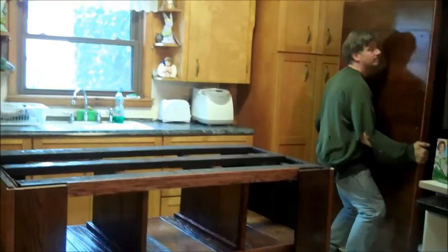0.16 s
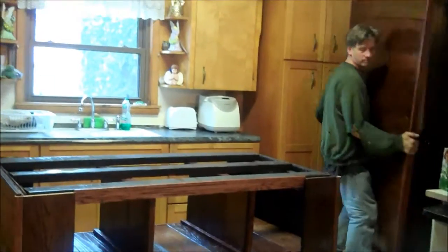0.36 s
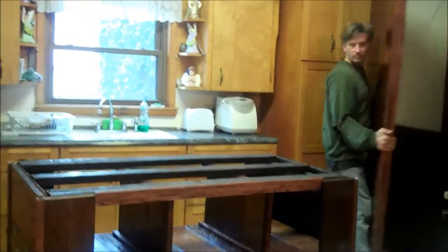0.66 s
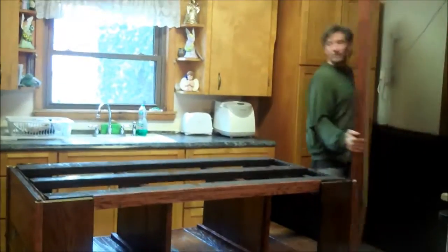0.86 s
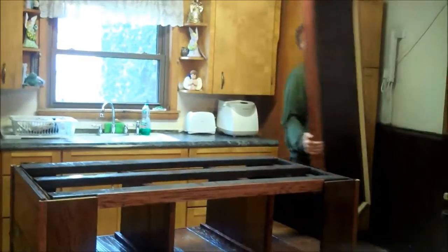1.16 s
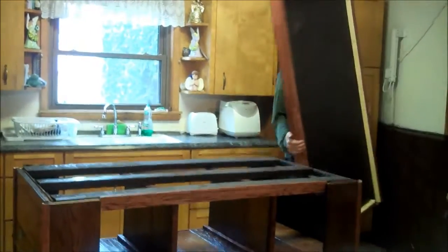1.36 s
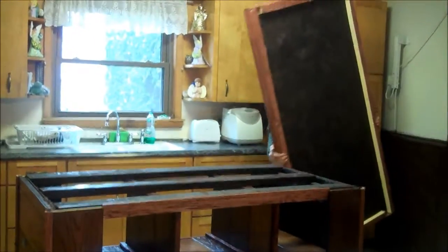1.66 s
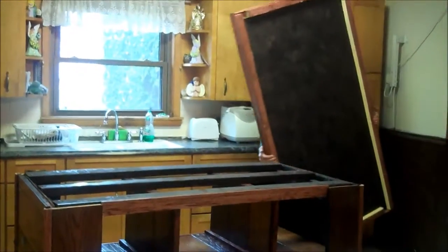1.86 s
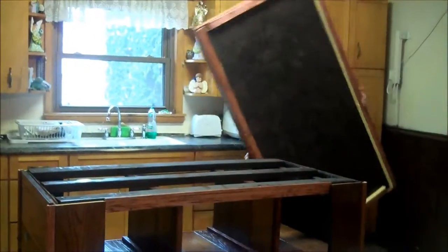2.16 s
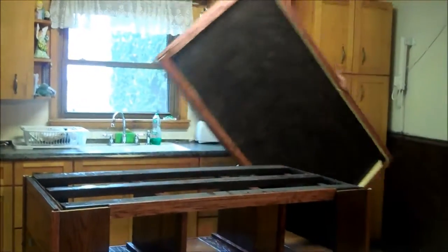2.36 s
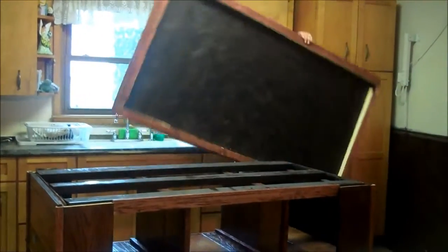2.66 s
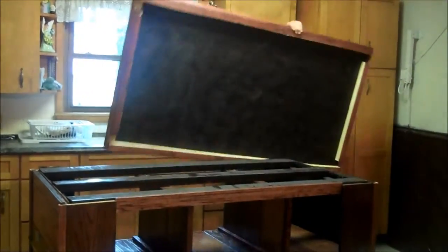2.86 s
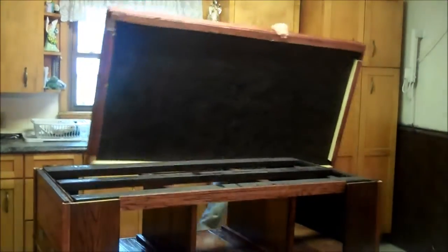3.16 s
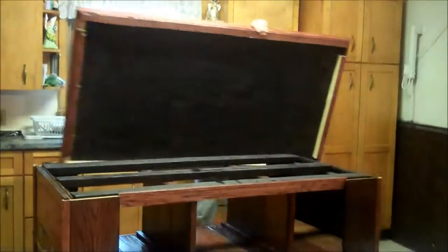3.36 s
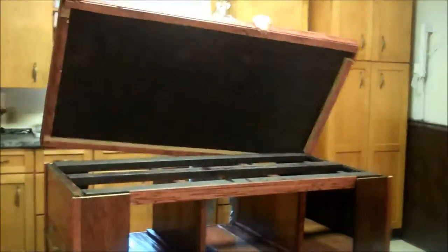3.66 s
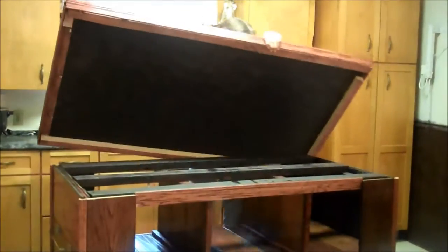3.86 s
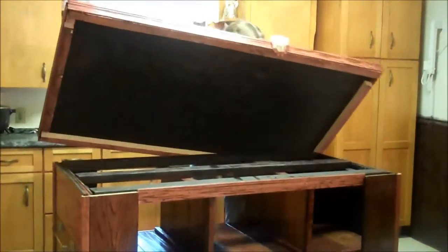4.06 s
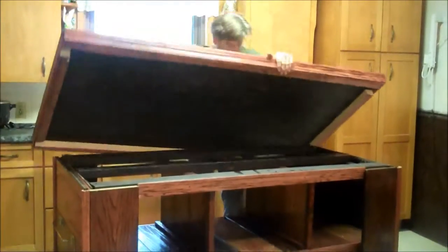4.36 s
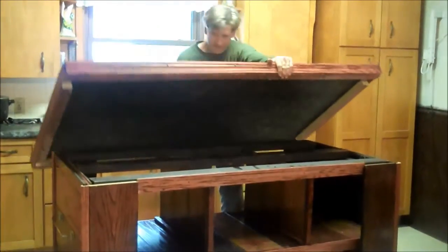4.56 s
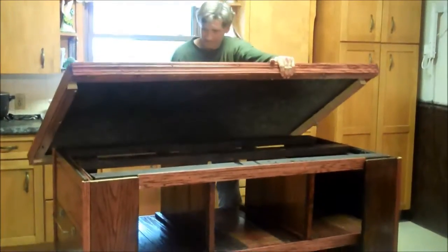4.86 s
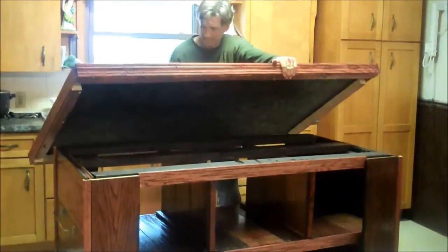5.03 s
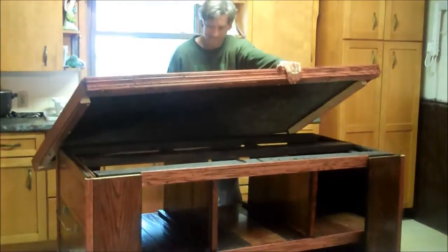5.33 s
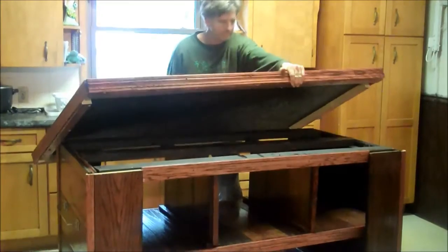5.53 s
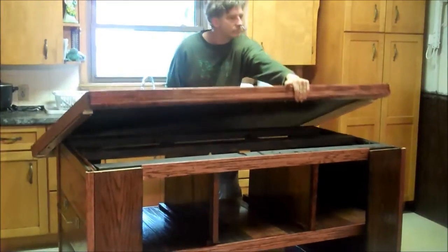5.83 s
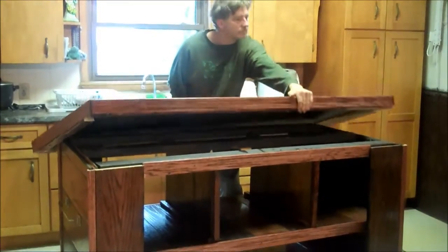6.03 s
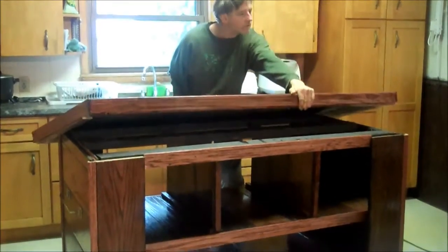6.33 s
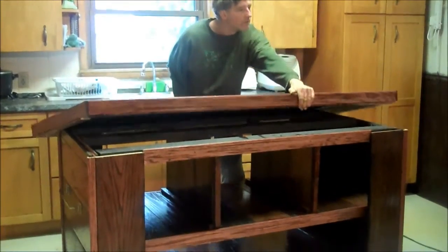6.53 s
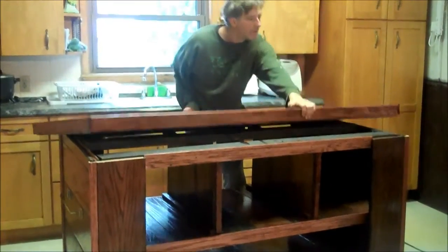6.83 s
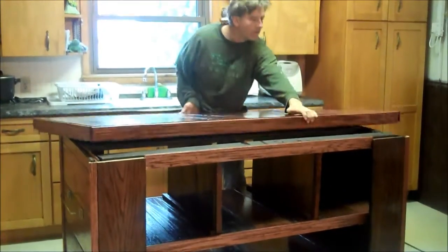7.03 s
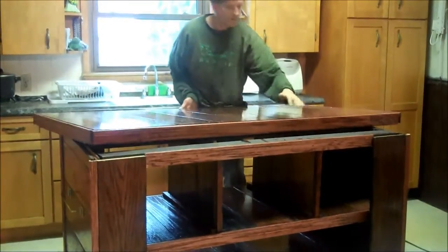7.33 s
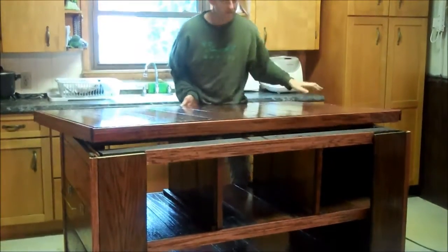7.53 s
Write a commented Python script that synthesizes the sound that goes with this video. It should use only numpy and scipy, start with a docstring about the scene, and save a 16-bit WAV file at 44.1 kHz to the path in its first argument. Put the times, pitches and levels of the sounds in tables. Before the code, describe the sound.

A heavy wooden top squeaks, cracks loudly onto its base and thuds into place, amid faint rustling in a kitchen.

```python
"""Clothes rustle and wood rubs and ticks over a faint hum: a man carries a heavy tabletop across a kitchen.
Soft blows bend the board into dull thuds. As he tips it onto its wooden base, the edge sticks and slips
in a squeak, then slams home with a loud crack that sets board and frame ringing. It drops into its seat
with a hollow clack and settles with more thuds. The hard room rings; the microphone ports add a hissy peak.
"""
import sys
import numpy as np
from scipy import signal
from scipy.fft import rfft, irfft
from scipy.io import wavfile
from scipy.ndimage import uniform_filter1d

SR = 44100
rng = np.random.default_rng(int(sys.argv[2]) if len(sys.argv) > 2 else 0)


def master_out(mix):
    """Clip the mix to full scale and print it as 16-bit PCM to the path in sys.argv[1]."""
    frames = np.transpose(np.atleast_2d(mix))
    ceiling = np.clip(frames, -1, 1)
    pcm = np.round(ceiling * 32767).astype(np.int16)
    wavfile.write(sys.argv[1], SR, pcm)


N = 339349

# Levels are set ahead of each layer's trim, the room and the microphone.
ROOM_DECAY = [(60, 0.54), (250, 0.84), (900, 0.37), (1600, 0.49), (3500, 0.4), (8000, 0.4), (14000, 0.3)]  # the kitchen's tail: frequency_hz, t60_s
STEREO_LIKENESS = [(60, 0.97), (300, 0.91), (630, 0.97), (1370, 0.58), (3000, 0.19), (6500, -0.4),
                   (14000, -0.021)]  # how alike left and right are in diffuse sound: frequency_hz, correlation
PORT_EQ = [(60, -7.5, -3.5), (930, 3.5, 6.5), (1245, -1, 1.5), (2320, 3.5, 0.94), (4570, 5, 4),
           (6420, 8.5, 3.5), (7770, 15, 8), (9570, 8.5, 9.5), (14400, 12.5, 10.5)]  # response of the two microphone ports: frequency_hz, left_db, right_db
AIR_EQ = [(20, -7), (45, -1), (90, -9), (130, 0.5), (190, -5.5), (280, 0.5), (400, -3), (850, -8),
          (1500, -7.5), (3500, -13), (7000, -15), (9500, -17.5), (11000, -25.5), (14000, -30)]  # room tone: frequency_hz, gain_db
MOTOR_HUM = [(59.2, -61.5), (296.1, -70), (1297, -70)]  # tones of a mains-driven motor: pitch_hz, level_db
HISS_BANDS = [(7820, 640, -79), (11830, 180, -83.5)]  # two faint, narrow bands of high hiss: centre_hz, width_hz, level_db

# each move of the body drags cloth and board together: peak_s, swell_s, fade_s, cloth_db, rub_db
STROKES = [(0.27, 0.073, 0.067, -48.5, -50), (0.355, 0.016, 0.087, -50, -55),
           (0.56, 0.025, 0.092, -47.5, -54.5), (0.68, 0.056, 0.077, -65, -50),
           (0.94, 0.028, 0.026, -51, -52.5), (1.10, 0.061, 0.095, -47, -52.5),
           (1.27, 0.053, 0.022, -51.5, -55), (1.75, 0.09, 0.032, -52, -53.5), (2.12, 0.017, .015, -50, -56),
           (2.24, .01, 0.26, -53.5, -59), (2.40, 0.08, 0.087, -53, -48), (2.48, 0.033, 0.053, -43.5, -48.5),
           (2.705, 0.06, 0.047, -41.5, -59), (2.92, 0.085, 0.062, -41, -52.5),
           (3.28, .01, 0.035, -50.5, -60), (3.435, 0.069, 0.067, -45.5, -54),
           (3.985, 0.046, 0.024, -45.5, -55), (4.31, .03, 0.059, -56, -57), (4.95, 0.14, 0.046, -58, -60),
           (5.156, 0.016, 0.015, -41.5, -39.5), (5.29, 0.06, 0.014, -58, -47),
           (6.35, 0.055, 0.083, -49, -58), (6.455, 0.083, 0.014, -51, -46.5), (6.73, 0.1, .12, -53.5, -65),
           (6.99, 0.13, 0.021, -48.5, -59), (7.16, 0.11, .05, -45, -55.5),
           (7.236, 0.0081, 0.035, -47.5, -43.5), (7.345, 0.04, 0.021, -44, -55),
           (7.43, 0.012, 0.049, -66, -48), (7.68, 0.032, .05, -49, -56)]
RUSTLE_BED = [(0, 1.86, -64, -58.5), (2.2, 4.1, -60, -62.5), (6.25, 7.69, -66, -59.5)]  # faint rustle while he keeps moving: start_s, end_s, cloth_db, rub_db
CLOTH_EQ = [(200, -32), (800, -7.5), (2000, 9), (3500, 4.5), (5500, 2), (8000, 1.5), (10000, -8),
            (11500, -16), (14000, -19.5)]  # bright cloth hiss: frequency_hz, gain_db
RUB_EQ = [(60, -47), (170, -5.5), (280, 0.5), (450, -11.5), (800, 0.5), (1150, -1), (1600, -0.5),
          (2500, -14), (4000, -19.5), (9000, -40.5)]  # dull rubbing of the board: frequency_hz, gain_db
GRATES = [(2.54, .04, 0.078, -54.5), (3.43, .012, 0.024, -42.5)]  # the edge grates along the rail: peak_s, swell_s, fade_s, level_db
GRATE_EQ = [(1200, -15), (3500, 5), (9000, -26)]  # its thin rasp: frequency_hz, gain_db
SLIDE = [(2.915, 0.033, 0.021, -39.5)]  # the board's full weight slides for a moment: peak_s, swell_s, fade_s, level_db
SLIDE_EQ = [(60, -1), (200, 5), (500, 7), (700, 9), (1000, 9), (1550, 5.5), (2200, -2), (6000, -6),
            (14000, -31)]  # its thick midrange: frequency_hz, gain_db

# light wooden taps, ring and treble relative to the click:
# start_s, level_db, pitch_hz, ring_db, treble_db, scrape_s
TAPS = [(0.0717, -32, 1800, -6, -5, 0.0056), (0.5546, -43, 2670, -11, -7, 0.0055),
        (0.6581, -38, 1990, -4, -13, .0072), (0.6844, -41, 1700, -2, -18, 0.0051),
        (1.1074, -44, 1800, -2, -1.5, 0.0047), (1.4859, -40, 1680, 4.5, -32, 0.0061),
        (2.1485, -51, 2000, 6, -11, .006), (2.2228, -43, 2600, -3, -1, .006),
        (3.6053, -40.5, 1780, -7.5, -20, 0.0029), (3.6437, -42, 1780, -6, -17, 0.0053),
        (3.733, -43.5, 2800, -8, -2.5, .004), (3.8069, -50, 1500, 9.5, -15, 0.0053),
        (4.454, -39, 2150, -4.5, -5.5, 0.0052), (4.4743, -41, 2370, -6, -4, 0.0047),
        (5.274, -38.5, 2240, -9, -15, 0.0068), (5.7613, -40, 2320, -5, -5.5, .003),
        (5.8604, -31.5, 2160, -8.5, -9, 0.0034), (6.0082, -43.5, 2700, -2, -3, 0.0038),
        (6.087, -47, 3500, -5, -13, .002), (6.116, -39.5, 1800, 3, -9, .002),
        (6.1468, -34.5, 2600, -6, -6.5, 0.0084), (6.4232, -37.5, 2300, -19, -20, 0.0033),
        (6.4514, -37.5, 2600, -6, -4, 0.0069), (7.4199, -35.5, 2930, -12, -7.5, 0.0015),
        (7.453, -53.5, 2800, -6, 9, 0.0027)]
# dull blows on the board and footfalls, clap relative to the blow: start_s, level_db, centre_hz, clap_db
THUDS = [(0.633, -47, 313, -10), (0.907, -49.5, 178, -5), (1.488, -48.5, 145, -26),
         (2.152, -46.5, 155, -15), (2.822, -51, 237, -2), (3.165, -54, 185, 3.5), (3.811, -44.5, 216, -8),
         (4.098, -47, 229, 2.5), (4.335, -57, 273, -5), (6.131, -42, 257, 8), (6.147, -35, 224, -1),
         (7.227, -27.5, 197, -12), (7.256, -28.5, 232, -16), (7.30, -37, 188.4, -10),
         (7.353, -34, 191, -11.5), (7.42, -43, 190, -8)]
BOARD_MODES = [(42.5, 12, 0.18), (56, 6, 0.31), (92, 10, 0.16), (119.7, 1, 0.49), (141, -2, 0.4),
               (167, 3, 0.29), (191.5, -5, 0.48), (210, -5, 0.5), (259.4, -8.5, 0.97), (289.3, -8.5, 0.65)]  # bending modes, before each hit scales their decay: pitch_hz, level_db, t60_s
CLAP_EQ = [(40, 3), (90, -9), (140, 10.5), (300, 7), (480, 1), (700, -1.5), (1200, -5), (3000, -34),
           (9000, -62.5)]  # flat wooden faces meeting: frequency_hz, gain_db

# faint squeaks of wood on wood: start_s, length_s, first_hz, last_hz, level_db, rolloff_db_per_partial
FAINT_SQUEAKS = [(2.139, 0.021, 940, 837, -51.5, 0), (2.223, 0.123, 758, 718, -56, 9.5),
                 (2.93, .09, 1560, 1544, -52, 9), (4.098, 0.0098, 1990, 1770, -32, 4.5),
                 (6.467, 0.203, 1578, 1540, -56.5, 12), (7.079, 0.04, 862, 967, -47.5, 8)]
# the path of the edge's loud squeak on the frame: time_s, pitch_hz, level_db, rolloff_db_per_partial
EDGE_SQUEAK = [(4.1043, 1552, -50, 2), (4.105, 1546, -21, -4), (4.111, 1660, -21.5, 1.5),
               (4.115, 1672, -16, 2), (4.123, 1560, -25, -0.5), (4.128, 1610, -17.5, 5),
               (4.137, 1520, -43, -3)]
SQUEAK_PARTIALS = [5, 3.5, -2, -9, -15, -23.5, -41]  # harmonics before rolloff, lowest first: level_db

CRACK = [(4.629, 0.0016, 0.0046, -10), (4.70, 0.01, 0.014, -28.5)]  # the edge slams home, then scrapes once more: peak_s, swell_s, fade_s, level_db
CRACK_EQ = [(40, -1), (300, -8.5), (700, 3.5), (1200, 2.5), (1900, 6), (2800, 4), (4000, 3), (5500, -0.5),
            (8000, -1), (10000, -9), (14000, -22)]  # the slam's broad bite: frequency_hz, gain_db
SNAPS = [(4.6301, -22.5), (4.6316, -19)]  # two hard snaps at the height of the slam: start_s, level_db
FRAME_CONTOUR = [(333.3, -3.5, 0.64), (470, -4, 0.26), (580, -20, 0.13), (720, -1.5, 0.7),
                 (940, -4.5, 0.96), (1100, -10, 0.98), (1410, 2, 0.26), (1988, 10.5, 0.078)]  # outline of the base's crowd of modes: frequency_hz, level_db, t60_s
CLACKS = [(6.108, 954, -41), (6.1157, 1315, -31.5)]  # the edge touches, then drops into its seat: start_s, first_hz, level_db


def gain_of(db):
    """Turns dB into a gain."""
    return np.exp(np.asarray(db) * (np.log(10) / 20))


def unit_rms(x):
    """Scales to rms 1."""
    return x / np.sqrt(np.mean(x ** 2) + 1e-20)


def unit_hit(x):
    """Scales a hit to the energy of 5 ms at rms 1."""
    return x / np.linalg.norm(x) * np.sqrt(.005 * SR)


def curve_at(points, hz):
    """Reads a curve on a log-frequency axis."""
    point_hz, value = np.transpose(points)
    return np.interp(np.log(hz + 1), np.log(point_hz + 1), value)


def add(mix, start_s, sound):
    """Drops a sound into the mix."""
    part = mix[..., max(round(start_s * SR), 0):][..., :sound.shape[-1]]
    part += sound[..., :part.shape[-1]]


def equalise(x, points, size=4096):
    """Minimum-phase EQ: nothing rings ahead of an attack."""
    log_gain = np.log(gain_of(curve_at(points, abs(np.fft.fftfreq(size, 1 / SR)))))
    impulse = np.fft.ifft(np.exp(np.conj(signal.hilbert(log_gain)))).real
    return signal.oaconvolve(x, impulse[:size // 2])[:len(x)]


def band(x, lo_hz, hi_hz):
    """Band-pass with soft skirts."""
    sections = signal.butter(2, [lo_hz, min(hi_hz, SR / 2 - 1)], "band", fs=SR, output="sos")
    return signal.sosfilt(sections, x)


def diffuse_noise(size):
    """Noise at two close ports: alike in the bass, wide in the treble."""
    left, unrelated = rfft(rng.standard_normal((2, size)))
    likeness = np.clip(curve_at(STEREO_LIKENESS, np.fft.rfftfreq(size, 1 / SR)), -1, 1)
    right = likeness * left + np.sqrt(1 - likeness ** 2) * unrelated
    return irfft(np.array([left, right]), size)


def room_tone(air_db=-56):
    """The bed: still air, a motor's hum and two faint, narrow bands of high hiss."""
    t = np.arange(N) / SR
    air = gain_of(air_db) * unit_rms(np.array([equalise(side, AIR_EQ) for side in diffuse_noise(N)]))
    hum = sum(gain_of(db) * np.sqrt(2) * np.sin(2 * np.pi * (hz * t + rng.random()))
              for hz, db in MOTOR_HUM)
    hiss = sum(gain_of(db) * unit_rms(band(rng.standard_normal((2, N)), hz - width / 2, hz + width / 2))
               for hz, width, db in HISS_BANDS)
    return air + hum + hiss


def reverb(x, predelay_s=.002, onset_s=0.00062):
    """A dense tail from cupboards and floor; each band dies at its own speed."""
    hz, t, spectrum = signal.stft(diffuse_noise(SR), SR, nperseg=256)
    decay = gain_of(-60 * t / curve_at(ROOM_DECAY, hz)[:, None])
    tail = signal.istft(spectrum * decay, SR, nperseg=256)[1]
    tail *= np.clip((np.arange(tail.shape[1]) / SR - predelay_s) / onset_s, 0, 1)
    tail /= np.linalg.norm(tail[0])
    out = np.zeros((2, len(x)))
    first, last = np.flatnonzero(x)[[0, -1]]
    add(out, first / SR, signal.fftconvolve(x[None, first:last + 1], tail, axes=1))
    return out


def kitchen(x, wet_db):
    """Equal-power blend of the direct sound and the room."""
    return (x + gain_of(wet_db) * reverb(x)) / np.sqrt(1 + gain_of(wet_db) ** 2)


def swells(rows):
    """Envelope of a run of strokes: each grows to its peak and dies away, and their powers add."""
    t, power = np.arange(N) / SR, np.zeros(N)
    for peak, swell, fade, db in rows:
        near = slice(*np.searchsorted(t, [peak - 7 * swell, peak + 7 * fade]))
        away = np.maximum((peak - t[near]) / swell, (t[near] - peak) / fade)
        power[near] += (gain_of(db) * np.exp(-away)) ** 2
    return np.sqrt(power)


def held(rows, ease_s=0.043):
    """Envelope that holds through each span and eases off outside it."""
    t = np.arange(N) / SR
    return sum(gain_of(db) * np.exp(-abs(t - np.clip(t, start, end)) / ease_s) for start, end, db in rows)


def friction(envelope, eq, grain_db=2.0, catches_per_s=1500):
    """Fibres catch and let go: a dense patter of tiny slips of uneven size."""
    sizes = gain_of(grain_db * np.minimum(rng.exponential(1, N), 3))
    slips = sizes * rng.choice([-1, 1], N) * (rng.random(N) < catches_per_s / SR)
    return envelope * unit_rms(equalise(slips, eq))


def rustle(cloth_trim_db=-2, rub_trim_db=-1):
    """Bright cloth hiss over the board's duller rubbing, with one heavy slide and two short grates."""
    cloth_strokes = swells([(*timing, db) for *timing, db, _ in STROKES])
    cloth_bed = held([(*timing, db) for *timing, db, _ in RUSTLE_BED])
    rub_strokes = swells([(*timing, db) for *timing, _, db in STROKES])
    rub_bed = held([(*timing, db) for *timing, _, db in RUSTLE_BED])
    cloth = friction(np.hypot(cloth_strokes, cloth_bed), CLOTH_EQ, grain_db=2.5, catches_per_s=4000)
    rub = friction(np.hypot(rub_strokes, rub_bed), RUB_EQ)
    slide = friction(swells(SLIDE), SLIDE_EQ)
    grate = friction(swells(GRATES), GRATE_EQ)
    return kitchen(gain_of(cloth_trim_db) * cloth + gain_of(rub_trim_db) * rub + slide + grate, wet_db=1)


def taps(trim_db=-2, ring_trim_db=1, ring_s=0.0065, rise_share=0.12, click_octaves=1.28):
    """Each tap is a short scrape: a click, its treble edge and a hand-damped ring."""
    out, t = np.zeros(N), np.arange(SR // 8) / SR
    spread = 2 ** (click_octaves / 2)
    for start, db, hz, ring_db, treble_db, scrape_s in TAPS:
        click_noise, edge_noise, body_noise = rng.standard_normal((3, len(t)))
        age = t / scrape_s
        contact = np.exp(-age) * (1 - np.exp(-age / rise_share))  # longer scrapes start more softly
        click = unit_hit(band(click_noise * contact, hz / spread, hz * spread))
        edge = gain_of(treble_db) * unit_hit(band(edge_noise * contact, 4600, 7940))
        body = unit_hit(band(body_noise * np.exp(-t / ring_s), 683, 1380))
        add(out, start, gain_of(db + trim_db) * (click + edge + gain_of(ring_db + ring_trim_db) * body))
    return kitchen(out, wet_db=3.0)


def ring(modes, damping, rise_s):
    """Half a second of dying modes; neighbouring modes push the air in opposite directions."""
    t = np.arange(SR // 2) / SR
    tones = sum((-1) ** k * gain_of(db - 60 * t * damping / t60) * np.sin(2 * np.pi * hz * t)
                for k, (hz, db, t60) in enumerate(modes))
    return tones * (1 - np.exp(-t / rise_s))


def thuds(trim_db=3, reach_octaves=.6, clap_s=0.02):
    """Soft blows wake the board's modes near a centre pitch and the flat faces clap; hands damp the ring."""
    out, t = np.zeros(N), np.arange(SR // 2) / SR
    for start, db, centre_hz, clap_db in THUDS:
        modes = [(hz, mode_db - 10 * np.log10(1 + (np.log2(hz / centre_hz) / reach_octaves) ** 4), t60)
                 for hz, mode_db, t60 in BOARD_MODES]
        bend = unit_hit(ring(modes, damping=2.45, rise_s=0.0014))
        clap = unit_hit(equalise(rng.standard_normal(len(t)) * np.exp(-t / clap_s), CLAP_EQ))
        add(out, start, gain_of(db + trim_db) * (bend + gain_of(clap_db) * clap))
    return kitchen(out, wet_db=-8.0)


def stick_slip(t, hz, partials_db, jitter):
    """A harmonic tone whose slips come a little unevenly."""
    wobble = unit_rms(uniform_filter1d(rng.standard_normal(len(t)), size=50))
    cycles = np.cumsum(hz * (1 + jitter * wobble)) / SR
    gains = gain_of(partials_db)
    tone = sum(gain * np.sin(2 * np.pi * k * cycles) for k, gain in enumerate(gains, 1))
    return tone / np.sqrt(sum(gains ** 2) / 2)


def squeal(t, hz, rolloff_db, jitter=0.0283, rasp_db=-20):
    """Wood sticking and slipping on wood: a tone, brighter under more weight, with a little rasp."""
    unsteadiness = jitter * (1 + rolloff_db / 4)  # a light contact slips less regularly
    partials_db = [db - k * rolloff_db for k, db in enumerate(SQUEAK_PARTIALS)]
    tone = stick_slip(t, hz, partials_db, unsteadiness)
    return tone + gain_of(rasp_db) * unit_rms(band(rng.standard_normal(len(t)), 310, 7100))


def squeaks(taper_share=0.26):
    """The edge drags on the frame in one loud squeak, among faint gliding ones; the room holds on to them."""
    out = np.zeros(N)
    times, *columns = np.transpose(EDGE_SQUEAK)
    t = np.arange(times[0], times[-1], 1 / SR)
    hz, db, rolloff_db = (np.interp(t, times, column) for column in columns)
    envelope = uniform_filter1d(gain_of(db), size=64)  # the tone takes a few slips to build
    add(out, times[0], envelope * squeal(t, hz, rolloff_db))
    for start, length, first_hz, last_hz, db, rolloff_db in FAINT_SQUEAKS:
        t = np.arange(0, length, 1 / SR)
        glide = np.linspace(first_hz, last_hz, len(t))
        envelope = gain_of(db) * signal.windows.tukey(len(t), taper_share)
        add(out, start, envelope * squeal(t, glide, rolloff_db))
    return kitchen(out, wet_db=0)


def crack(contacts=4, lead_s=.02):
    """The long edge hits at several points at once, and each reaches the room by its own paths."""
    start = CRACK[0][0] - lead_s
    force = swells(CRACK)[round(start * SR):][:SR] / np.sqrt(contacts)
    out = np.zeros((2, N))
    for _ in range(contacts):
        burst = force * unit_rms(equalise(rng.standard_normal(SR), CRACK_EQ))
        add(out, start, kitchen(burst, wet_db=3.0))
    return out


def frame_ring(count=140):
    """Rails and panels ring with a crowd of modes of random pitch and phase, under the base's contour."""
    hz, db, t60 = np.transpose(FRAME_CONTOUR)
    t = np.arange(SR * 3 // 4) / SR
    scatter, phase = rng.random((2, count, 1))
    mode_hz = hz[0] + (hz[-1] - hz[0]) * (np.arange(count)[:, None] + scatter) / count
    fade = gain_of(np.interp(mode_hz, hz, db) - 60 * t / np.interp(mode_hz, hz, t60))
    return (fade * np.sin(2 * np.pi * (mode_hz * t + phase))).sum(0)


def knock(frame_db=-18.5, board_db=-23, snap_hz=8000, snap_s=.00018):
    """The slam's attack and body: the hard edge snaps twice and sets frame and board ringing."""
    snaps, wood = np.zeros((2, N))
    t = np.arange(SR // 20) / SR
    snap = unit_hit(t * np.exp(-t / snap_s) * np.sin(2 * np.pi * snap_hz * t))
    for start, db in SNAPS:
        add(snaps, start, gain_of(db) * snap)
    add(wood, 4.629, gain_of(frame_db) * unit_hit(frame_ring()))
    add(wood, 4.627, gain_of(board_db) * unit_hit(ring(BOARD_MODES, damping=0.62, rise_s=0.0022)))
    return kitchen(snaps, wet_db=-6) + kitchen(wood, wet_db=-7.5)


def clack(rest_hz=870, sag_s=.0045, fade_s=0.0064, overtone_db=-24):
    """The edge seats itself: short, hollow slips of sinking pitch, dulled by the wood and fairly dry."""
    out, t = np.zeros(N), np.arange(SR // 20) / SR
    for start, first_hz, db in CLACKS:
        hz = rest_hz + (first_hz - rest_hz) * np.exp(-t / sag_s)
        tone = stick_slip(t, hz, [0, overtone_db], jitter=0.12)
        add(out, start, gain_of(db) * np.exp(-t / fade_s) * tone)
    return kitchen(band(out, 450, 2000), wet_db=-5)


def scene():
    """The carry, the squeak, the slam and the settling, over the quiet of the kitchen."""
    return room_tone() + rustle() + taps() + thuds() + squeaks() + crack() + knock() + clack()


def record(dry, ceiling=.86, cutoff_hz=14300):
    """Each port adds its own resonance, a soft clip rounds the crack, and a steep low-pass trims the top."""
    hz, *sides_db = np.transpose(PORT_EQ)
    coloured = np.array([equalise(side, np.column_stack([hz, db])) for side, db in zip(dry, sides_db)])
    rounded = coloured / (1 + (coloured / ceiling) ** 4) ** .25
    low_pass = signal.firwin(511, cutoff_hz, window=("kaiser", 9), fs=SR)
    return signal.oaconvolve(rounded, low_pass[None], "same")


dry = scene()
out = record(dry)
master_out(out)
```